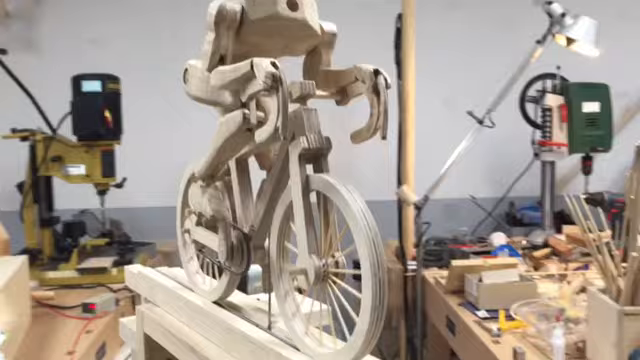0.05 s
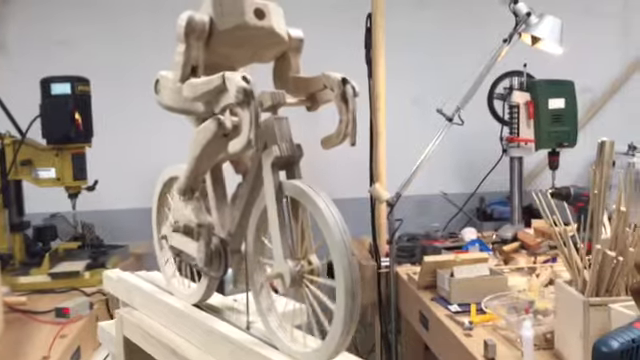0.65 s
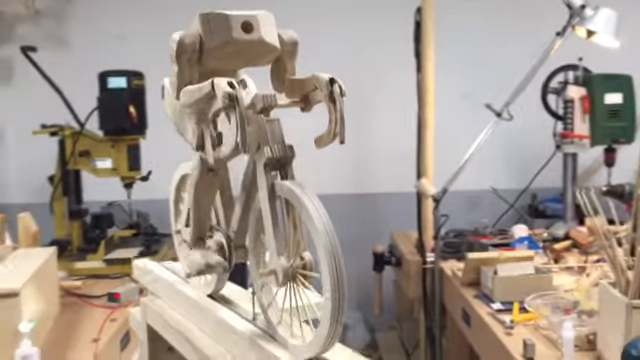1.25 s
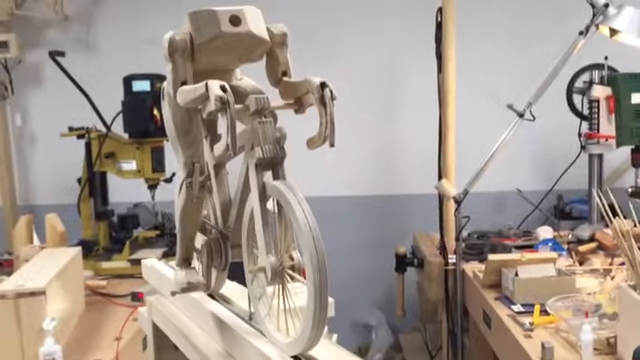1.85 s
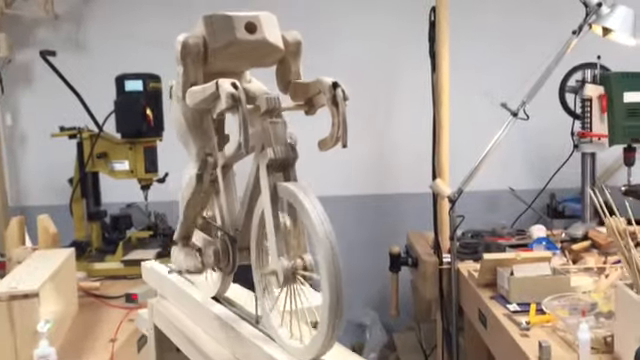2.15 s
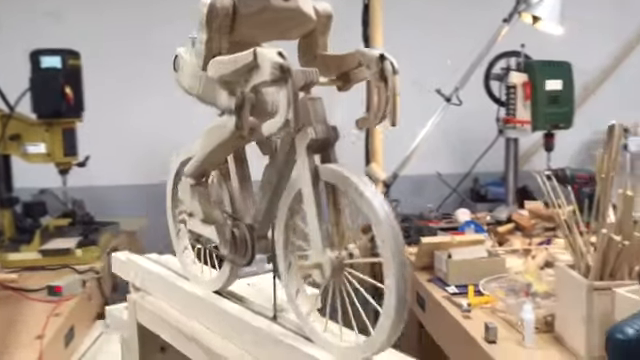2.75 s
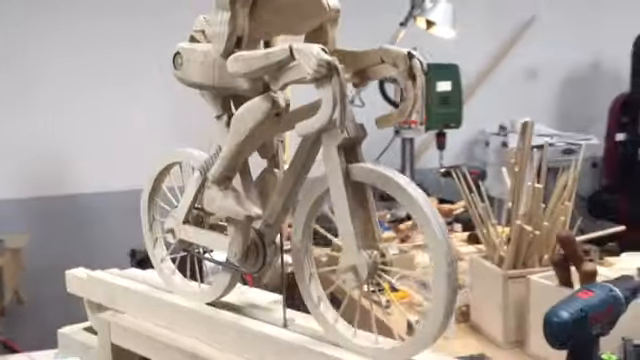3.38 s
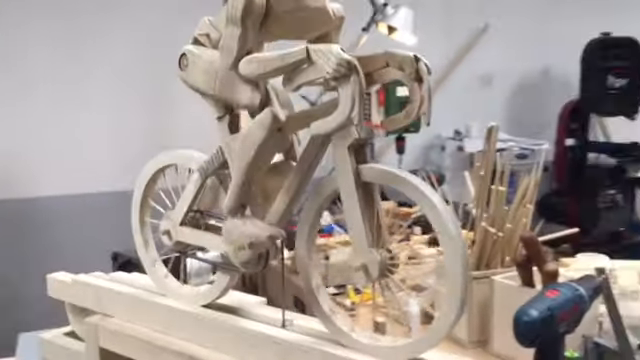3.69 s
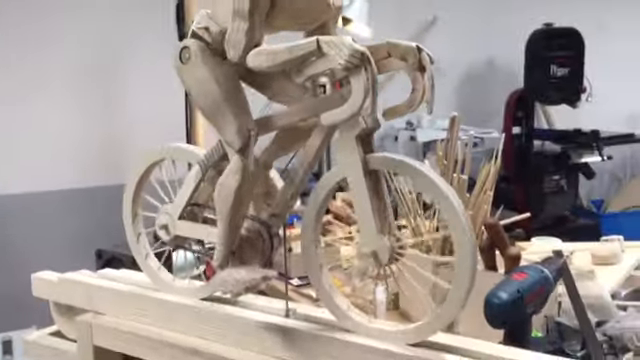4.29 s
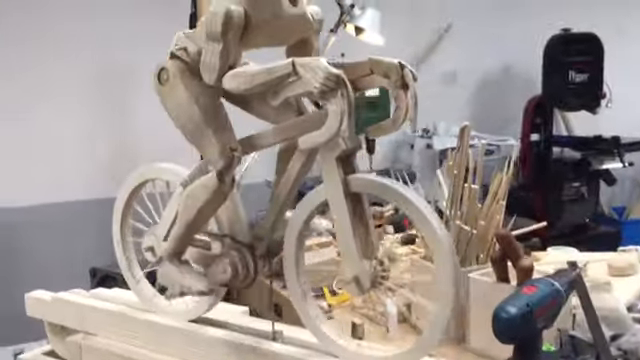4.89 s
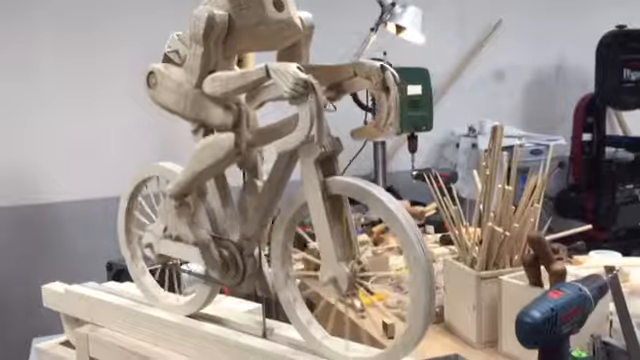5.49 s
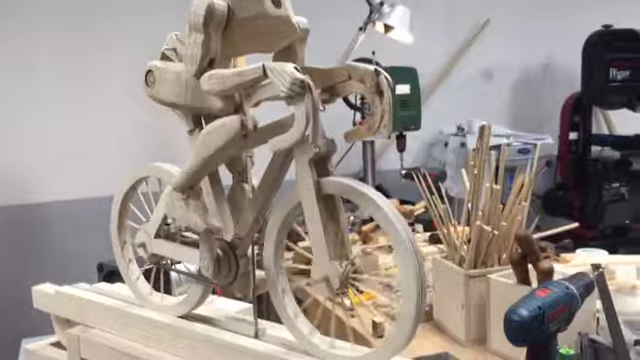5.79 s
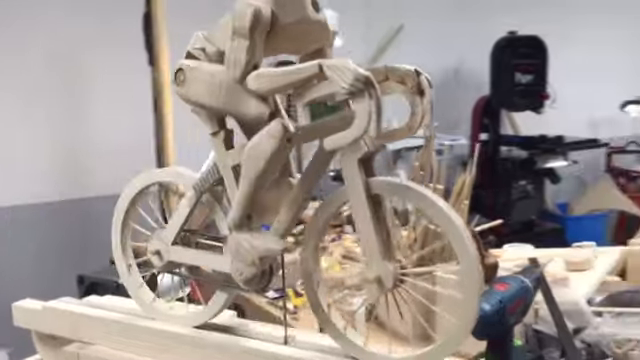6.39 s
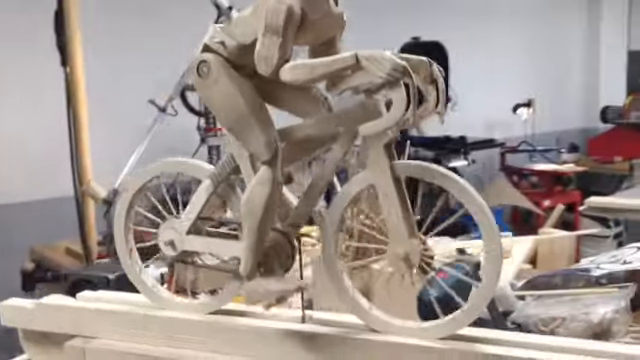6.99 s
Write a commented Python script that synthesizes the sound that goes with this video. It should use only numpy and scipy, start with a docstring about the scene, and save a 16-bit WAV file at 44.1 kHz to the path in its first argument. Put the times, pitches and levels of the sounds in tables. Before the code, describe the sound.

A small geared motor runs throughout, with a steady whine and the rasp of worn gear teeth, as it drives a carved wooden cyclist. Loose wooden joints tick in uneven flurries, with faint chatter, tiny squeaks and a rubbing hiss. The whine changes colour as the close microphone moves from the front to the side. Two soft, dull bumps pass in the second half, over a low workshop rumble.

```python
"""A small geared motor drives a carved wooden cyclist, pedalling on its stand in a workshop.
The pinion whines and the worn gear teeth rasp through the housing, all locked to one turning wheel.
Loose wooden joints tick in flurries as the legs push, with faint chatter, squeaks and sliding wood.
The microphone is carried from the front of the figure round to its side; two dull bumps pass on the
way, over the low rumble of the room."""
import sys
import numpy as np
from scipy import signal
from scipy.fft import rfft, irfft
from scipy.io import wavfile
from scipy.ndimage import uniform_filter1d, map_coordinates

SR = 44100
rng = np.random.default_rng(int(sys.argv[2]) if len(sys.argv) > 2 else 0)


def dump(signal):
    """Clip the signal to [-1, 1] and save it as 16-bit WAV at the path in sys.argv[1]."""
    limited = np.clip(np.atleast_2d(signal).T, -1, 1)
    pcm = np.round(limited * 32767).astype(np.int16)
    wavfile.write(sys.argv[1], SR, pcm)


N = 319284
TIME, HZ = np.arange(N) / SR, np.fft.rfftfreq(N, 1 / SR)
MOTOR_TURNS_PER_WHEEL, PINION_TEETH = 5, 10
BACKLASH = .4  # share of the rasp's power that never repeats


def amp(db):
    """Decibels to gain."""
    return 10 ** (np.asarray(db) / 20)

def unit_rms(x):
    """Scales to an rms of one."""
    return x / np.sqrt(np.mean(x ** 2) + 1e-20)

def follow(curve):
    """Draws an automation curve through (seconds, value) points."""
    return np.interp(TIME, *np.transpose(curve))

def colour(x, eq):
    """Shapes x with an EQ curve, at an rms of one."""
    hz, db = np.transpose(eq)
    gain = amp(np.interp(np.log(HZ + 1), np.log(hz), db))
    return unit_rms(irfft(rfft(x) * gain, N))

def drift(rate_hz):
    """Smooth random modulation up to about the given rate."""
    return unit_rms(irfft(rfft(rng.standard_normal(N)) * np.exp(-(HZ / rate_hz) ** 2), N))

def add(mix, s, sound):
    """Lays a sound into the mix at s seconds."""
    part = mix[max(round(s * SR), 0):][:len(sound)]
    part += sound[:len(part)]


# The motor's pace. Each row: time in seconds, motor turns a second.
MOTOR_SPEED = [(0, 95.75), (.7, 95.55), (1.4, 95.75), (1.95, 95.55), (2.35, 96.0), (3.3, 95.68),
               (4.3, 95.75), (5.0, 95.9), (6.3, 95.75), (7.24, 95.85)]
def wheel_turns():
    """Running count of the first wheel's turns, geared down from a faintly wavering motor."""
    speed = follow(MOTOR_SPEED) * (1 + .0005 * drift(8))
    return np.cumsum(speed) / SR / MOTOR_TURNS_PER_WHEEL

# Tooth note and its octave as the microphone moves round. Each row: time in seconds, level in dB.
NOTE_LEVEL = [(0, -35.5), (.55, -34.5), (.82, -41.5), (1.2, -35), (1.85, -30.5), (2.42, -36.5),
              (2.8, -34.5), (3.38, -43.5), (3.92, -40), (4.33, -44), (4.92, -37.5), (5.55, -40),
              (5.92, -45), (6.35, -46), (6.63, -51.5), (6.8, -42.5), (7.24, -54)]
OCTAVE_LEVEL = [(0, -51), (.9, -49), (1.5, -53.5), (2.06, -58), (2.15, -43.5), (2.5, -46.5), (3.05, -40.5),
                (3.28, -42.5), (3.8, -35.8), (4.75, -38), (6.0, -35.5), (6.6, -39), (6.83, -57),
                (7.24, -49)]
def pinion_whine(wheel, oval=.038, lobed=.085, eccentric=.3, flutter=.097, unsteady_db=-55):
    """Tooth note and octave throb as the slightly untrue wheel turns; a weak note is the least steady."""
    angle = 2 * np.pi * wheel
    mesh = angle * MOTOR_TURNS_PER_WHEEL * PINION_TEETH
    note_throb = 1 + oval * np.cos(2 * angle) + lobed * np.sin(3 * angle)
    note_gain = amp(follow(NOTE_LEVEL)) * note_throb + amp(unsteady_db) * drift(21.6)
    octave_throb = 1 + eccentric * np.cos(angle) + flutter * drift(35)
    octave_gain = amp(follow(OCTAVE_LEVEL) + .77) * octave_throb
    return np.sqrt(2) * (note_gain * np.sin(mesh) + octave_gain * np.sin(2 * mesh))

# Swells of the tone just above the octave. Each row: time in seconds, level in dB.
SIDEBAND_LEVEL = [(0, -59), (.8, -40), (1.5, -67), (2.75, -48), (3.3, -50), (3.75, -49), (4.7, -59.5),
                  (6.05, -46), (7.24, -52)]
def pinion_sideband(wheel):
    """The off-centre pinion adds a tone one motor harmonic above the octave."""
    order = (2 * PINION_TEETH + 1) * MOTOR_TURNS_PER_WHEEL
    return np.sqrt(2) * amp(follow(SIDEBAND_LEVEL) - 1) * np.sin(2 * np.pi * order * wheel)

def third_harmonic(wheel, upper_rasp_db, pulse_depth=.8):
    """The tooth note's third harmonic rings roughly with the upper rasp and pulses once a wheel turn."""
    angle = 2 * np.pi * wheel
    level_db = -49.5 + 2.1 * (upper_rasp_db - upper_rasp_db.max())
    phase = 3 * PINION_TEETH * MOTOR_TURNS_PER_WHEEL * angle + 1.3 * drift(45)
    return np.sqrt(2) * amp(level_db) * (1 + pulse_depth * np.cos(angle)) * np.sin(phase)

def high_whine(wheel, strain, place, harmonics=(54, 55), waver_db=3, flutter=.46):
    """Two neighbouring motor harmonics sing thinly, louder under strain and softer from the side."""
    motor_angle = 2 * np.pi * MOTOR_TURNS_PER_WHEEL * wheel
    gain = amp(-63 + 1.5 * strain - 3 * place + waver_db * drift(7.5))
    return gain * sum((1 + flutter * drift(32)) * np.sin(k * motor_angle) for k in harmonics)

# Pitches of the gear train. Each entry: a multiple of the first wheel's speed.
TONE_ORDERS = [5, 10, 15, 20, 25, 29, 30, 35, 41, 45, 46, 47, 48, 49, 60, 63, 64, 65, 73, 78, 80, 85, 90,
               95, 110, 115, 120, 122, 127, 140, 149, 150, 151, 161, 165, 172, 200, 205]
# Their balance, tone for tone. Each row: level at the front in dB, level at the side in dB.
TONE_LEVELS = [(-51, -50.5), (-60, -56), (-66, -61), (-59, -61.5), (-71, -59), (-76, -63.5), (-58, -62),
               (-60.5, -55.5), (-57.5, -60.5), (-64, -58.5), (-61, -56), (-47, -49), (-42.5, -60),
               (-60, -65), (-44, -50.5), (-50, -50.5), (-67, -77), (-53.5, -47.5), (-42, -52.5), (-45, -51),
               (-62, -43), (-42.5, -56.5), (-46, -55), (-78, -56), (-49.5, -56), (-42, -75), (-56, -52.5),
               (-48.5, -45.5), (-60, -60.5), (-55, -56), (-65, -52.5), (-60, -58), (-48, -56), (-57, -59),
               (-71, -67), (-53, -63.5), (-61, -68), (-59, -61)]
def gear_tones(wheel, rasp_db, place, trim_db=-2.5, gear_waver_db=2.5, hum_waver_db=2, play_rad=.52):
    """Motor hum and lesser gear tones shift with the listening place; the gear tones ride the rasp."""
    out, load_db = np.zeros(N), rasp_db - np.median(rasp_db)
    wavers, shake = [drift(3) for _ in range(7)], drift(31)
    for k, (order, (front_db, side_db)) in enumerate(zip(TONE_ORDERS, TONE_LEVELS)):
        is_gear = order > 40
        waver = np.roll(wavers[k % len(wavers)], rng.integers(N))
        db = front_db + place * (side_db - front_db) + trim_db
        db += load_db + gear_waver_db * waver if is_gear else hum_waver_db * waver
        # play between the teeth shakes the high tones most
        play = play_rad * order / TONE_ORDERS[-1] * np.roll(shake, rng.integers(N))
        out += amp(db) * np.sin(2 * np.pi * (order * wheel + rng.random()) + play)
    return np.sqrt(2) * out

def tooth_rasp(wheel, loose_share, uneven_db, sharpness, creep=.42, size=2048):
    """Each tooth scrapes in its own way, the same at every wheel turn; backlash adds a loose share."""
    turn = np.arange(size) / size
    teeth = PINION_TEETH * MOTOR_TURNS_PER_WHEEL
    wear = rng.standard_normal(teeth) + np.tile(rng.standard_normal(PINION_TEETH), MOTOR_TURNS_PER_WHEEL)
    # wear differs from tooth to tooth rather than from one side of the wheel to the other
    wear -= uniform_filter1d(wear, size=7, mode="wrap")
    tooth_gain = amp(uneven_db * np.tanh(wear))[(turn * teeth).astype(int)]
    contact = tooth_gain * np.exp(-sharpness * (turn * teeth % 1))
    tonal_orders = TONE_ORDERS + [teeth, 2 * teeth, 2 * teeth + MOTOR_TURNS_PER_WHEEL]
    tracks = []
    for _ in range(2):
        spectrum = rfft(contact * rng.standard_normal(size))
        # the rasp fills the gaps between the strong tones
        gaps = ~np.isin(np.arange(len(spectrum)), tonal_orders)
        one_turn = irfft(gaps * spectrum / abs(spectrum))
        tracks.append(unit_rms(map_coordinates(one_turn, [wheel % 1 * size], order=3, mode="grid-wrap")))
    # the wheel creeps along its axle, so the contact shifts between two tracks
    shift = creep * drift(.73)
    steady = tracks[0] * np.cos(shift) + tracks[1] * np.sin(shift)
    backlash = unit_rms(np.interp(wheel % 1, turn, contact) * rng.standard_normal(N))
    return np.sqrt(1 - loose_share) * steady + np.sqrt(loose_share) * backlash

# Body of the rasp, falling as the microphone draws away. Each row: time in seconds, level in dB.
RASP_LEVEL = [(0, -40), (.75, -38.5), (1.3, -40.3), (2.6, -40.5), (3.2, -39), (5.5, -40), (6.5, -38.5),
              (7.24, -42.5)]
# The housing's resonances. Each row: frequency in Hz, gain in dB.
HOUSING_EQ = [(30, -60), (100, -39), (400, -31), (560, -16), (730, -29), (850, -5.5), (920, 3),
              (1060, -5.5), (1230, -3), (1550, -2.5), (1780, -2.5), (2080, -7.5), (2300, -4.5),
              (2520, -14.5), (3300, -36.5)]
def housing_rasp(wheel):
    """Worn teeth rasp through the housing, which rings in the midrange."""
    rasp = tooth_rasp(wheel, BACKLASH, uneven_db=2, sharpness=.69)
    return amp(follow(RASP_LEVEL) - .23) * colour(rasp, HOUSING_EQ)

# The rasp's bright edge. Each row: time in seconds, level in dB.
UPPER_RASP_LEVEL = [(0, -48.5), (1.2, -54), (2.05, -50.5), (2.7, -54.5), (3.05, -45), (3.5, -47.5),
                    (3.75, -51), (4.2, -50), (4.5, -48), (5.15, -49), (5.35, -51), (6.3, -50.5),
                    (6.53, -46), (7.24, -52)]
# The cover's resonances. Each row: frequency in Hz, gain in dB.
COVER_EQ = [(1500, -23), (2400, 4), (2600, 2), (2860, 3.5), (3020, 4), (3250, 4), (3520, -9.5), (3900, -1),
            (4600, -31), (5250, -11), (6100, -7), (7500, -25), (16000, -24)]
def cover_rasp(wheel):
    """The cover gives the scraping teeth their bite around 3 kHz."""
    rasp = tooth_rasp(wheel, BACKLASH, uneven_db=3, sharpness=.8)
    return amp(follow(UPPER_RASP_LEVEL) - 2) * colour(rasp, COVER_EQ)

# Modes of a loose joint. Each row: frequency in Hz, level in dB, seconds to fall by 60 dB.
JOINT_MODES = [(4310, -11.5, 0.028), (5380, -16, 0.019), (6423, -3.5, 0.02), (6446, -10, 0.021),
               (7350, -1.5, 0.0086), (8150, -4.5, 0.03), (8494, -8.5, 0.026), (8637, -5.5, 0.027),
               (10140, -3.5, 0.0071), (11400, -13, 0.0083), (15260, -2, 0.0066)]
def joint_ring(centre_hz, focus_db=7, focus_width_hz=600, scatter=.01, attack_s=.00029):
    """A struck joint rings briefly, favouring its modes near centre_hz."""
    t = np.arange(1800) / SR
    hz, db, t60 = np.transpose(JOINT_MODES)[:, :, None]
    db = db + focus_db * np.exp(-((hz - centre_hz) / focus_width_hz) ** 2)
    cycles = hz * (1 + scatter * rng.standard_normal(hz.shape)) * t + rng.random(hz.shape)
    ring = (amp(db - 60 * t / t60) * np.sin(2 * np.pi * cycles)).sum(0)
    ring *= 1 - np.exp(-t / attack_s)
    return ring / abs(ring).max()

# The grit of dry wood contacts. Each row: frequency in Hz, gain in dB.
GRIT_EQ = [(1500, -9), (4500, 3.5), (7300, 6), (10500, -2.5), (13000, 0.5), (14800, -1.5), (16000, -4)]
# Flurries of ticks. Each row: start in seconds, ring level in dB, favoured pitch in Hz, snap level in dB.
JOINT_TICKS = [(0.0823, -40, 8260, -52), (0.485, -33, 8420, -53), (0.6457, -36, 8150, -53),
               (0.6674, -33, 8670, -43), (0.7761, -40, 6510, -53), (0.7914, -34, 8540, -45),
               (0.799, -22.5, 8100, -40), (0.8939, -31, 5540, -50), (0.9315, -24, 8350, -39.5),
               (0.9672, -31, 7750, -55), (1.0134, -32, 6400, -49), (1.0423, -25, 8570, -40),
               (1.129, -28.5, 8500, -55), (1.1917, -30, 8540, -67), (1.671, -34, 8640, -54),
               (1.9126, -32.5, 8800, -63), (1.963, -37, 8390, -48), (2.057, -27.5, 8400, -46),
               (2.337, -41, 8550, -59), (2.6838, -43, 8630, -46), (2.7823, -27, 8000, -45),
               (2.8182, -25, 6300, -43), (2.858, -30.5, 8000, -57), (2.9044, -38, 5750, -45),
               (3.07, -22.5, 8500, -53), (3.1132, -27, 6100, -39.5), (3.1537, -31, 6230, -40),
               (3.2623, -24, 7500, -46), (3.3544, -29, 8700, -57), (3.3884, -29, 8560, -52),
               (3.424, -27, 8440, -43), (3.469, -27.5, 8370, -58), (3.5844, -28.5, 6370, -45),
               (3.6263, -31, 8580, -41), (3.6571, -34, 8550, -52), (3.6997, -25.5, 6360, -45),
               (3.741, -28, 8640, -56), (3.8587, -29, 8840, -71), (3.9373, -32, 8400, -42.5),
               (4.2178, -35, 8770, -50), (4.254, -25, 8630, -42), (4.34, -26, 8800, -39.5),
               (4.405, -23, 8440, -38), (4.4523, -31, 6190, -48), (4.4908, -27.5, 6380, -43),
               (4.5236, -31.5, 8540, -45), (4.6853, -33, 8800, -46), (4.764, -29, 8550, -44),
               (5.121, -41, 8570, -45), (5.3218, -41, 8270, -52), (5.435, -34.5, 8440, -66),
               (5.7663, -28, 7800, -46), (5.806, -24, 7940, -44), (5.862, -30, 8800, -52),
               (5.8973, -28.5, 8500, -42), (5.964, -26, 8600, -51), (6.048, -27, 8400, -50),
               (6.0819, -27.5, 8140, -40), (6.1868, -35.5, 6190, -52), (6.249, -33, 8500, -41.5),
               (6.3405, -28, 6450, -45), (6.4246, -45, 6400, -54), (6.4573, -22.5, 6430, -41),
               (6.5016, -35, 8450, -53), (6.538, -27.5, 7900, -42), (6.58, -30.5, 8150, -43.5),
               (6.654, -26, 6700, -39), (6.7503, -35, 8750, -64), (6.8367, -29.5, 8480, -45)]
def joint_ticks(ring_trim_db=-2, snap_boost_db=12, snap_s=.00088, slip_db=-11, slip_s=.0065):
    """Loose pins drop into their holes: a dry snap and a short ring, amid smaller slips and rebounds."""
    out, grit = np.zeros(N), colour(rng.standard_normal(N), GRIT_EQ)
    hardest_db = max(snap_db for *_, snap_db in JOINT_TICKS)
    for s, ring_db, hz, snap_db in JOINT_TICKS:
        # soft contacts snap less and ring more purely
        softness_db = hardest_db - snap_db
        snap_gain = amp(snap_db + snap_boost_db - .45 * softness_db)
        slips = [(slip_s * rng.uniform(-.64, 1.6), slip_db - 5 * rng.random()) for _ in range(3)]
        for lag_s, contact_db in [(0, 0)] + slips:
            ring = amp(ring_db + ring_trim_db) * joint_ring(hz, focus_db=4 + .53 * softness_db)
            t = np.arange(len(ring)) / SR
            snap = snap_gain * grit[rng.integers(N - len(t)):][:len(t)] * np.exp(-t / snap_s)
            add(out, s + .001 + lag_s, amp(contact_db) * (ring + snap))
    return out

def joint_strain(spread_s=.26):
    """Strain on the linkage, 0 to 1: it rises where hard ticks crowd together and eases between them."""
    crowd = sum(amp(db) * np.exp(-((TIME - s) / spread_s) ** 2) for s, db, _, _ in JOINT_TICKS)
    return np.sqrt(crowd / crowd.max())

def joint_chatter(level_db, per_s=110, spread_db=4):
    """Between the ticks the same joints chatter faintly."""
    out, pitches_hz = np.zeros(N), np.linspace(7900, 8800, num=8)
    for hz in pitches_hz:
        knocks = rng.random(N) < per_s / len(pitches_hz) / SR
        force = amp(spread_db * np.minimum(rng.exponential(1, N), 3))
        out += signal.oaconvolve(knocks * force, joint_ring(hz))[:N]
    return amp(level_db) * unit_rms(out)

def fibre_crackle(level_db, per_s=300, grain_s=.002):
    """Wood fibres catch and let go while the joints are under load."""
    catches = (rng.random(N) < per_s / SR) * rng.random(N)
    envelope = signal.lfilter([1], [1, -np.exp(-1 / (grain_s * SR))], catches)
    return amp(level_db) * colour(envelope * rng.standard_normal(N), GRIT_EQ)

# Chafing joints. Each row: start in seconds, length in seconds, pitch in Hz, level in dB.
JOINT_SQUEAKS = [(0.46, 0.052, 7670, -57), (0.612, .035, 4220, -47), (0.654, 0.031, 4170, -51),
                 (1.54, 0.027, 7800, -49.5), (1.895, 0.037, 8530, -52), (2.33, 0.018, 8480, -47),
                 (3.196, 0.045, 8700, -50), (3.342, .03, 8200, -50), (3.725, .015, 6450, -57),
                 (4.623, 0.031, 7360, -53), (4.715, 0.019, 7400, -47), (4.749, 0.0534, 8620, -43.5),
                 (4.856, 0.039, 8360, -51), (5.85, 0.039, 9600, -52), (6.424, 0.013, 7380, -48),
                 (6.45, 0.029, 4280, -51), (6.646, 0.032, 4300, -52), (6.813, 0.032, 7800, -56),
                 (6.93, 0.047, 7540, -53.5)]
def joint_squeaks(roughness_hz=420):
    """Dry wood sticks and slips for a moment in a narrow, rough band."""
    out, rough = np.zeros(N), drift(roughness_hz)
    for s, length, hz, db in JOINT_SQUEAKS:
        t = np.arange(int(length * SR)) / SR
        grain = rough[rng.integers(N - len(t)):][:len(t)] * np.sin(np.pi * t / length)
        add(out, s, 2 * amp(db) * grain * np.sin(2 * np.pi * hz * t))
    return out

# Sliding wood with the joints slack. Each row: time in seconds, level in dB.
SLIDE_LEVEL = [(0, -47.5), (1.6, -53.5), (2.7, -52), (5, -53.5), (7.24, -53)]
# Its hissy tone. Each row: frequency in Hz, gain in dB.
SLIDE_EQ = [(2000, -8.5), (3400, 2.5), (4300, 2.5), (5800, 1), (7200, -7), (8600, 0), (9500, -6),
            (11200, -4.5), (11700, -3), (12200, -8), (13500, -12), (14800, -28), (15800, -40)]
def sliding_wood(wheel, strain, strain_db=2.5, flicker_db=2.2):
    """Wood rubs on wood in step with the gears: a flickering hiss that swells under strain."""
    level_db = follow(SLIDE_LEVEL) + strain_db * strain + flicker_db * drift(37)
    rub = tooth_rasp(wheel, np.sqrt(BACKLASH), uneven_db=1, sharpness=.41)
    return amp(level_db) * colour(rub, SLIDE_EQ)

# Two bumps of three thuds. Each row: start in seconds, level in dB, pitch in Hz, seconds to fall by 60 dB.
THUDS = [(4.744, -31, 90.5, 0.096), (4.802, -40, 125.5, 0.38), (4.845, -35, 85, 0.18),
         (6.05, -31.5, 192, 0.12), (6.056, -31, 103, 0.27), (6.105, -42, 99.4, 0.24)]
def dull_bumps(attack_s=.0065):
    """Soft, low knocks that die quickly."""
    out, t = np.zeros(N), np.arange(SR // 3) / SR
    for s, db, hz, t60 in THUDS:
        envelope = (1 - np.exp(-t / attack_s)) * amp(db - 60 * t / t60)
        add(out, s, envelope * np.sin(2 * np.pi * hz * t))
    return out

def moving_reflections(x, t60=.035, stations=9):
    """Reflections off the stand and bench comb the sound; the comb shifts as the microphone moves on."""
    t, wet = np.arange(SR // 6) / SR, np.zeros(N)
    position = np.linspace(0, stations - 1, N)
    for k in range(stations):
        taps = rng.standard_normal(len(t)) * (rng.random(len(t)) < .1) * (t > .0007)
        taps *= amp(-60 * t / t60)
        nearness = np.cos(np.pi / 2 * np.clip(position - k, -1, 1))
        wet += nearness * signal.oaconvolve(x, taps / np.linalg.norm(taps))[:N]
    return (x + wet) / np.sqrt(2)

def workshop_reverb(x, wet_db=-3.5, t60=.24):
    """Direct sound plus dense short reflections from the bench and walls."""
    t = np.arange(SR // 2) / SR
    taps = rng.choice([-1., 1.], len(t)) * (rng.random(len(t)) < .15) * (t > .002)
    tail = taps * amp(-60 * t / t60)
    return x + amp(wet_db) * signal.fftconvolve(x, tail / np.linalg.norm(tail))[:N]

# The room tone. Each row: time in seconds, level in dB.
RUMBLE_LEVEL = [(0, -49.5), (.8, -48.5), (2.3, -52), (3.4, -49), (3.7, -51), (4.1, -51.5), (4.9, -51),
                (5.3, -50.5), (7.24, -53)]
# Its bass-heavy colour. Each row: frequency in Hz, gain in dB.
RUMBLE_EQ = [(20, -46), (40, -32), (60, -12), (70, 3), (80, -4), (110, -16.5), (135, -13), (165, -13.5),
             (220, -12.5), (300, -17), (600, -11.5), (2000, -25), (16000, -52)]
def room_rumble():
    """A low bed of noise, strongest near 70 Hz."""
    return amp(follow(RUMBLE_LEVEL)) * colour(rng.standard_normal(N), RUMBLE_EQ)

# The path round the figure. Each row: time in seconds, place from 0 (front) to 1 (side).
MICROPHONE_PATH = [(0, 0.59), (1.0, 0.23), (1.9, 0.15), (2.5, 0.27), (3.1, 0.82), (4.2, 1), (7.24, 0.98)]
def scene():
    """One wheel drives all the gear sounds; the wooden linkage ticks, chatters and slides above them."""
    wheel, strain, place = wheel_turns(), joint_strain(), follow(MICROPHONE_PATH)
    tones = pinion_whine(wheel) + pinion_sideband(wheel) + high_whine(wheel, strain, place)
    tones += gear_tones(wheel, follow(RASP_LEVEL), place)
    tones += third_harmonic(wheel, follow(UPPER_RASP_LEVEL))
    rasp = housing_rasp(wheel) + cover_rasp(wheel)
    sliding = moving_reflections(sliding_wood(wheel, strain))
    strain_db = 13.5 * strain
    joints = joint_ticks() + joint_chatter(strain_db - 68.5)
    joints += fibre_crackle(strain_db - 73.5) + joint_squeaks()
    return (tones + rasp + sliding + workshop_reverb(joints) + dull_bumps() + room_rumble())[None]

def record(dry, cutoff_hz=15900):
    """A steep low-pass takes off the very top."""
    lowpass = signal.firwin(511, cutoff_hz, window=("kaiser", 9), fs=SR)
    return signal.oaconvolve(dry, lowpass[None], "same")


dry = scene()
out = record(dry)
dump(out)
```